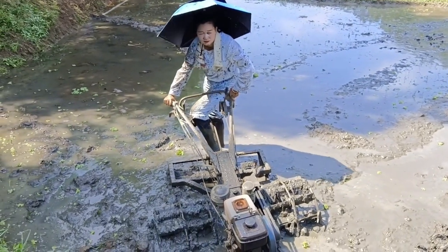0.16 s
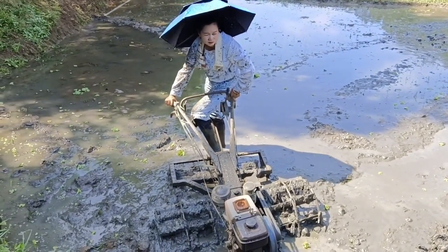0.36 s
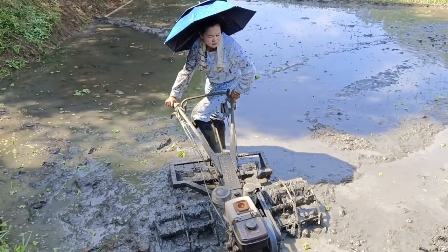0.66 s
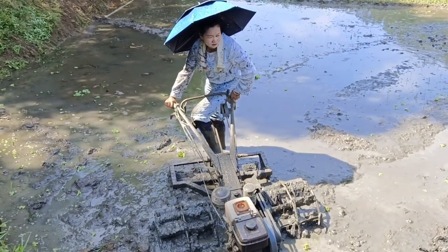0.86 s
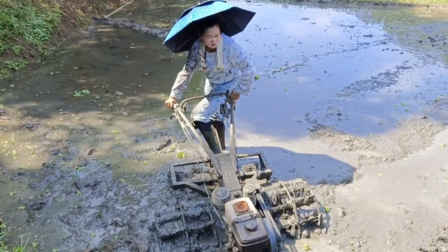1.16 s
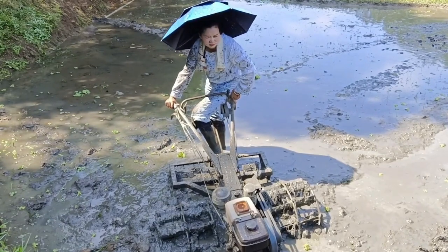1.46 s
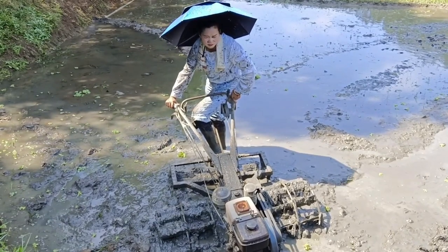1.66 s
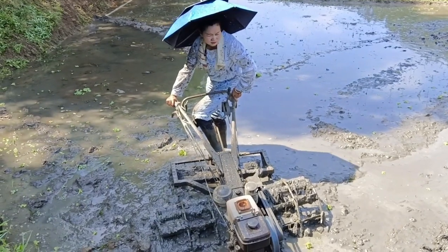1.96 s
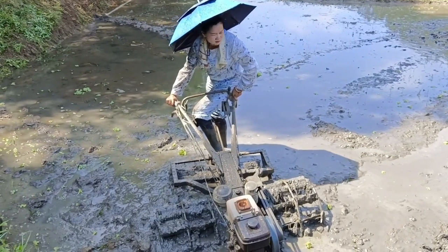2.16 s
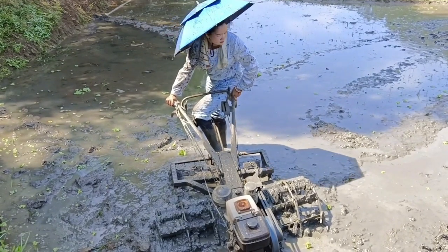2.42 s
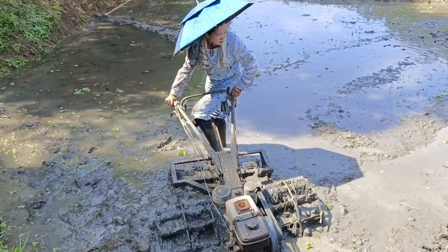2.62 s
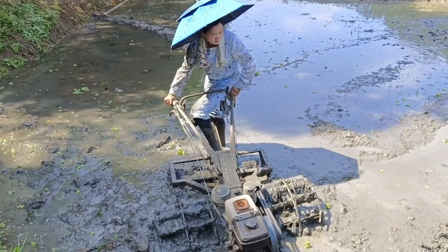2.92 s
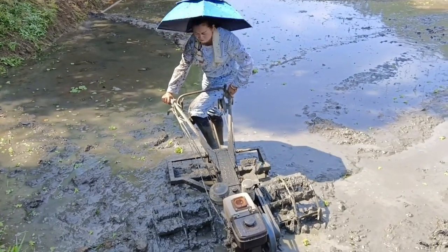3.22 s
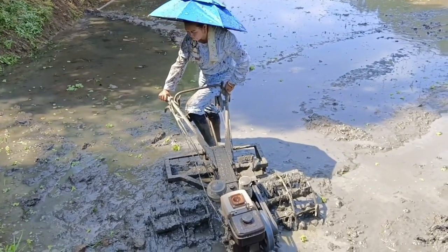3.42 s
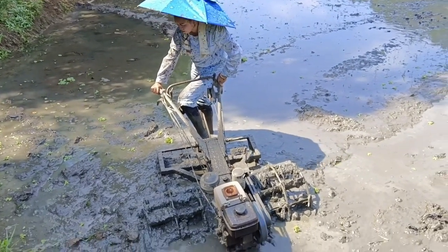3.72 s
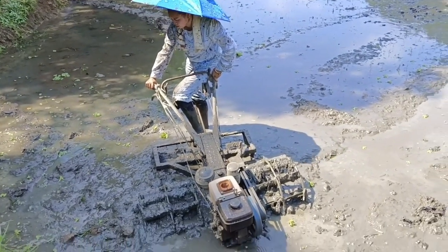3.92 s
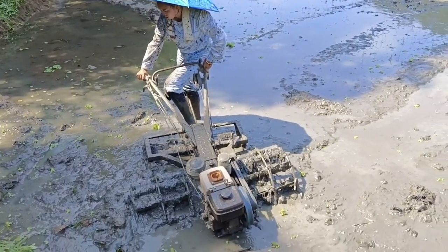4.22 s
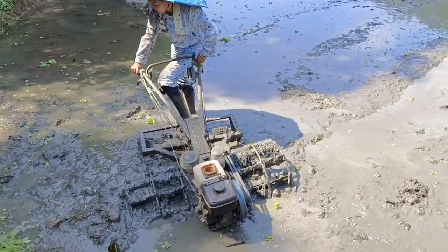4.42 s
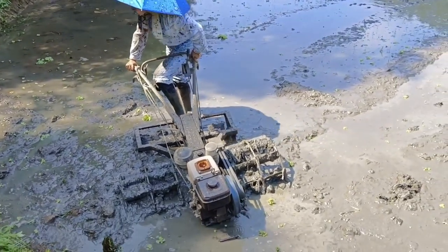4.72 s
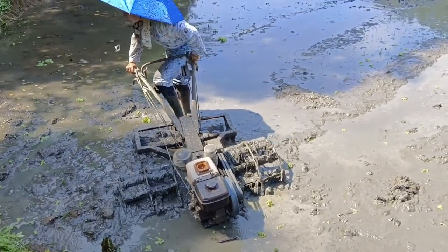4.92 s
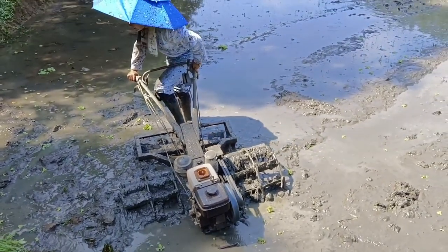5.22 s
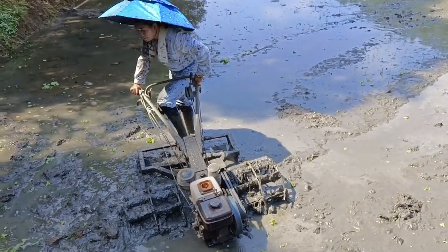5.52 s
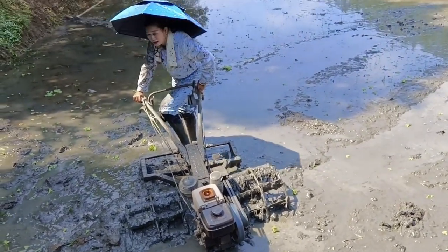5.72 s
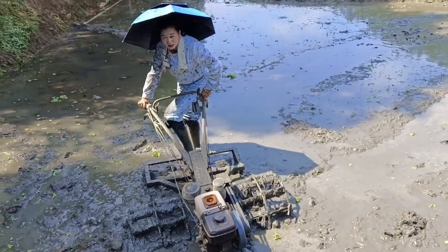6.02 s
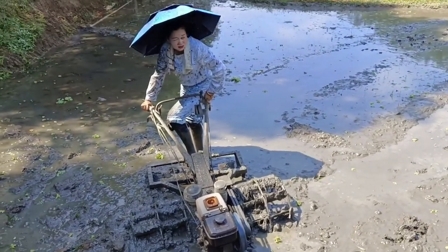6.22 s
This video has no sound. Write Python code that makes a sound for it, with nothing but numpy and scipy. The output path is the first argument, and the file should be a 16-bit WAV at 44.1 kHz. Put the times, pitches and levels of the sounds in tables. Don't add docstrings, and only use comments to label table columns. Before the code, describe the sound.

A small single-cylinder engine on a walk-behind tractor runs without a break in a flooded field, about nineteen quick beats a second. Hollow low exhaust pulses mix with metallic knocks, valve clatter and a fine spray-like hiss. Around four seconds the clatter brightens and panels buzz more strongly. Heard outdoors, close up, in stereo, dry, with slightly watery, thinned treble.

```python
import sys
import numpy as np
from scipy import signal
from scipy.fft import rfft, irfft, next_fast_len
from scipy.io import wavfile
from scipy.ndimage import uniform_filter1d

SR = 44100
rng = np.random.default_rng(int(sys.argv[2]) if len(sys.argv) > 2 else 0)


def convert_level_to_amplitude(level_db):
    exponent = np.asarray(level_db, float) / 20
    return 10 ** exponent


def store_wav(level_fs):
    pcm = np.round(np.clip(np.atleast_2d(level_fs), -1, 1) * 32767)
    wavfile.write(sys.argv[1], SR, pcm.T.astype(np.int16))


N = 280917

SPEED_UP = 1.22
HEARD_CYCLES_PER_S = 18.9
LONG = next_fast_len(int(N * SPEED_UP) + SR // 10)
HZ = np.fft.rfftfreq(LONG, 1 / SR)


def evened(x):
    return x / np.sqrt(np.mean(x ** 2) + 1e-20)


def read(points):
    hz, value = np.transpose(points)
    return np.interp(np.log(HZ + 1), np.log(hz + 1), value)


def heard_time():
    return np.arange(LONG) / SR / SPEED_UP


# time_s, lead_ms
ENGINE_LEAD = [(0.0, 24.3), (0.642, 22.9), (1.269, 20), (1.911, 18.3), (2.55, 17.4), (3.18, 11.9),
               (3.82, 11.06), (4.46, 10.0), (5.1, 12), (5.73, 22.5), (6.37, 23.6)]


def cycles():
    time_s, lead_ms = np.transpose(ENGINE_LEAD)
    drift_s = np.interp(heard_time(), time_s, lead_ms) / 1000
    return HEARD_CYCLES_PER_S * (heard_time() + drift_s)


def stroke(place, rise_s, fall_s, uneven_db, shake_s):
    turns = cycles() - place + .5
    index = turns.astype(int).clip(0)
    shake, strength = rng.standard_normal((int(turns[-1]) + 2, 2))[index].T
    t = (turns % 1 - .5) * SPEED_UP / HEARD_CYCLES_PER_S + shake_s * shake
    swell = np.exp(-(t / np.where(t < 0, rise_s, fall_s)) ** 2 / 2)
    return t, convert_level_to_amplitude(uneven_db * strength) * swell


# pitch_hz, coherence_0_to_1
PORT_COHERENCE = [(60, 1), (330, 1), (560, 0.93), (1000, .86), (2000, .88), (4000, 0.66), (8000, 0.34),
                  (13000, 0.17)]
# pitch_hz, level_db
PORT_TILT = [(60, 0.5), (330, .45), (640, 4.5), (1150, 10.5), (2600, 3), (4600, 9), (9300, -5.5),
             (14000, 0.8)]
# pitch_hz, lag_rad
PORT_LAG = [(0, 0), (60, .12), (330, .22), (600, .55), (1290, .5), (1720, -.5), (2930, .5), (4050, -.4),
            (5250, 2.6), (5770, 3.6), (8610, 3.3), (11400, -.2)]


def ports(a, b):
    same = np.clip(read(PORT_COHERENCE), -1, 1)
    half = convert_level_to_amplitude(read(PORT_TILT) / 2)
    right = same * a * np.exp(-1j * read(PORT_LAG)) + np.sqrt(1 - same ** 2) * b
    return np.array([a * half, right / half])


def excitation(gate):
    return ports(*rfft(gate * rng.standard_normal((2, LONG))))


def coloured(source, colour):
    return evened(irfft(source * colour, LONG))


def rattle_gate(blows, grit_db):
    grit = convert_level_to_amplitude(grit_db * evened(uniform_filter1d(rng.standard_normal(LONG), 120)))
    level = 1
    for place, rise_s, fall_s, db in blows:
        level = level + convert_level_to_amplitude(db) * stroke(place, rise_s, fall_s, 1.3, .0005)[1]
    return grit * level


def mode(hz, width_hz):
    return 1 / (1 + 2j * (HZ - hz) / width_hz)


# pitch_hz, width_hz, level_db over the rattle
BLOCK_MODES = [(556.6, 7.5, 4.5), (1302.7, 51, 5), (2022.4, 65, 5.5), (2399, 115, 3.5), (2698, 30, 6.5),
               (2907, 92, 3.5), (4600, 24, -2), (5594, 17, -3.5), (9120, 1070, 4)]


def metal():
    return 1 + sum((convert_level_to_amplitude(db) - 1) * mode(hz, width_hz) for hz, width_hz, db in BLOCK_MODES)


# time_s, turn_0_to_1
FACING_TURN = [
    (0, 0.32),
    (2.198, .1),
    (3.6, .35),
    (4.35, 0.94),
    (5.3, 0.91),
    (5.6, 0.77),
    (6.37, 0.8),
]


def turned(db):
    return convert_level_to_amplitude(db * np.interp(heard_time(), *np.transpose(FACING_TURN)))


# pitch_hz, level_db per Hz
RUMBLE_COLOUR = [(12, -66), (25, -32), (123, -19.5), (168, -8), (220, 0), (292, -1.5), (443, -25),
                 (500, -22), (650, -73), (1100, -120)]


def rumble():
    return convert_level_to_amplitude(-27.5) * coloured(excitation(1), convert_level_to_amplitude(read(RUMBLE_COLOUR)))


def whirr():
    return convert_level_to_amplitude(-30) * turned(-4.5) * coloured(excitation(1), metal() * mode(1200, 1000) ** 2)


def spray(source):
    return convert_level_to_amplitude(-35.5) * turned(1) * coloured(source, mode(14000, 4200) ** 2)


# start_s, length_s, level_db
PANEL_SPELLS = [
    [(.6, 3.6, -42.5), (4.2, 1.4, -32), (5.85, 0.61, -32.5)],
    [(.6, 0.59, -39.5), (2.4, 0.56, -40), (3.0, 2.06, -33.5), (5.7, 0.86, -33.5)],
    [(0, 1.2, -44), (3.2, 0.894, -39.5), (5.6, 1.03, -42.5)],
    [(4.3, 1.0, -41), (5.7, 0.88, -45)],
    [(4.196, 1.21, -36.5)],
    [(0, 3.3, -49.5), (0, 3.7, -46.5)],
    [(0, 3.5, -54.5), (5.0, 1.43, -57)],
]


def ringing(spells):
    def edge(start_s):
        return np.clip((heard_time() - start_s) / .12 + .5, 0, 1)

    gain = convert_level_to_amplitude(-46.5)
    for start_s, length_s, db in spells:
        gain = gain + convert_level_to_amplitude(db) * (edge(start_s) - edge(start_s + length_s))
    return gain


# pitch_hz, width_hz
PANEL_MODES = [(955, 75), (4043, 80), (5244, 55), (5006, 160), (805, 163), (9300, 1050), (568.9, 36)]


def panels(source):
    out = 0
    for spells, (hz, width_hz) in zip(PANEL_SPELLS, PANEL_MODES):
        out = out + ringing(spells) * coloured(source, mode(hz, width_hz) ** 2)
    return out


# pitch_hz, level_db per Hz
VALVE_COLOUR = [(1760, -56), (3000, -6.5), (3200, -14), (3650, -24.5), (4030, -3), (4660, -18.5), (5110, 1),
                (7460, -2.5), (8110, -5.5), (9330, -14.5), (10600, -10.5), (14800, -18), (16000, -84)]


def valves(source):
    return convert_level_to_amplitude(-25.5) * turned(3) * coloured(source, metal() * convert_level_to_amplitude(read(VALVE_COLOUR)))


# place_cycle (0-1), rise_s, fall_s, level_db over the steady rattle
VALVE_BLOWS = [
    (.42, 0.0084, 0.0034, 3.2),
    (.55, 0.0025, 0.0068, 0.94),
    (.825, 0.0018, .006, 4.1),
]


def clatter():
    source = excitation(rattle_gate(VALVE_BLOWS, 1.6))
    return spray(source) + panels(source) + valves(source)


# place_cycle (0-1), rise_s, fall_s, level_db over the steady rattle
KNOCK_BLOWS = [
    (.83, 0.0017, 0.0051, 6.5),
    (0.38, 0.0028, 0.0042, 3),
    (.616, 0.0031, 0.0023, -0.5),
    (.125, 0.0025, 0.0021, -6.5),
    (0.48, 0.0025, 0.0036, -5),
]
# pitch_hz, level_db per Hz
KNOCK_COLOUR = [(250, -37), (420, -4), (501, -22), (567, -11), (642, -13.5), (943, 0.5), (1060, -7.5),
                (1310, -2.5), (1790, -5), (2950, 1), (3630, -4), (4020, -5), (5000, -8.5), (6500, -47),
                (11000, -120)]


def knock():
    source = excitation(rattle_gate(KNOCK_BLOWS, 1.5))
    return convert_level_to_amplitude(-21.5) * turned(-2) * coloured(source, metal() * convert_level_to_amplitude(read(KNOCK_COLOUR)))


def rings(table):
    out = np.zeros(LONG)
    for place, hz, rise_s, fall_s, db in table:
        t, swell = stroke(place, rise_s, fall_s, 0.28, 0.00022)
        out += convert_level_to_amplitude(db) * swell * np.cos(2 * np.pi * hz * t)
    return irfft(ports(rfft(out), 0), LONG)


# place_cycle (0-1), pitch_hz, rise_s, fall_s, level_db
HEAD_RINGS = [
    (.835, 2900, .0015, 0.0071, -21.5),
    (0.6, 2000, .0015, 0.0046, -29),
    (.38, 3200, 0.0011, 0.0014, -26),
    (.617, 3000, 0.0013, 0.0026, -29.5),
]


def head():
    return rings(HEAD_RINGS)


# place_cycle (0-1), pitch_hz, rise_s, fall_s, level_db
PIPE_RINGS = [
    (.907, 274, .003, .0036, -8.6),
    (.068, 300, .0045, .004, -18),
    (.173, 278, .003, .0038, -11.8),
    (.31, 235, .0025, .002, -23),
    (.619, 222, .0082, .0030, -10.2),
    (.752, 290, .0022, .0015, -26),
    (.72, 91, 0.0076, 0.0075, -33),
    (.6, 165, 0.008, 0.006, -26),
]


def pipes():
    return rings(PIPE_RINGS)


# time_s, shift_s
SPLICE_SHIFT = [
    (5.0, 0),
    (5.22, -.028),
    (5.55, -.028),
    (5.8, 0),
]


def sped_up(x):
    piece, seek, fade = .0605 * SR, int(.0075 * SR), int(.018 * SR)
    ramp, mid = np.linspace(0, 1, fade), x.mean(0)
    out = x[:, :N + SR // 10].copy()
    source = 0
    starts = np.arange(.048 * SR - fade / 2 + piece, N, piece)
    starts = (starts + SR * np.interp(starts / SR, *np.transpose(SPLICE_SHIFT))).astype(int)
    for before, at in zip(np.r_[0, starts], starts):
        old = source + at - before
        near = int(at * SPEED_UP + (piece + fade) * (SPEED_UP - 1) / 2) - seek // 2
        span = mid[near:near + seek + fade]
        energy = np.convolve(span ** 2, np.ones(fade), "valid")
        match = np.correlate(span, mid[old:old + fade] * np.hanning(fade)) / np.sqrt(energy)
        source = near + np.argmax(match)
        out[:, at:at + 2 * int(piece)] = x[:, source:source + 2 * int(piece)]
        out[:, at:at + fade] += (1 - ramp) * (x[:, old:old + fade] - out[:, at:at + fade])
    return out[:, :N]


def scene():
    return sped_up(rumble() + whirr() + clatter() + knock() + head() + pipes())


# pitch_hz, level_db
TREBLE_HOLES = [(5800, -5), (6600, -2), (8400, -.2), (9000, -6), (10000, -5), (10600, .2), (11400, -1.2),
                (12300, .6), (13300, -.4), (13900, -2.6), (15000, -2), (15600, 1.5)]


def thinned(x, weak_db=-3.0):
    mid_side = np.array([[1, 1], [1, -1]]) / np.sqrt(2)
    hz, _, z = signal.stft(mid_side @ x, SR, "cosine", nperseg=2048)
    power = abs(z) ** 2
    usual = uniform_filter1d(uniform_filter1d(power, size=41, axis=1), size=9, axis=2)
    band = uniform_filter1d(uniform_filter1d(power, size=16, axis=1), size=2, axis=2)
    centre = np.minimum(np.arange(len(hz)) // 16 * 16 + 8, len(hz) - 1)
    band = band[:, centre]
    steady = np.median(band, axis=2, keepdims=True)
    limit = np.sqrt(steady * uniform_filter1d(band, size=12, axis=2))
    limit = limit * convert_level_to_amplitude(2 * np.interp(hz, *np.transpose(TREBLE_HOLES)))[:, None]
    kept = (power > usual * convert_level_to_amplitude(2 * weak_db)) & (band > limit)
    kept = (kept | (hz < 5900)[:, None]) & (hz < 15850)[:, None]
    return mid_side @ signal.istft(z * kept, SR, "cosine", nperseg=2048)[1][:, :N]


def top_cut(x):
    return signal.sosfilt(signal.butter(12, 16590, fs=SR, output="sos"), x)


def record(dry):
    mix = thinned(np.tanh(dry / 0.83))
    return top_cut(mix)


dry = scene()
out = record(dry)
store_wav(out)
```